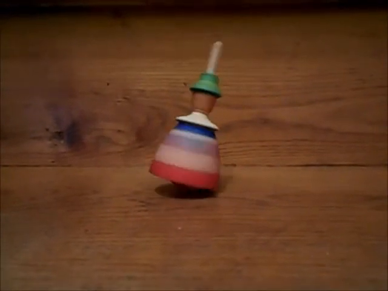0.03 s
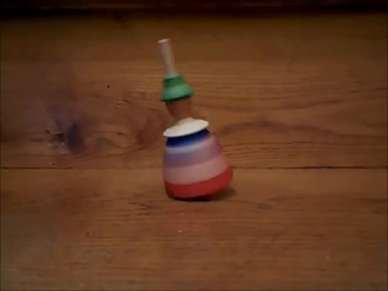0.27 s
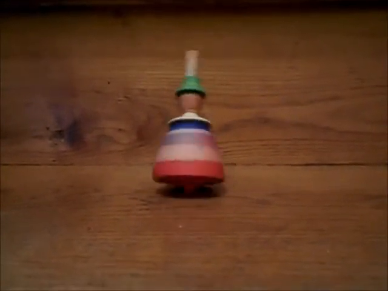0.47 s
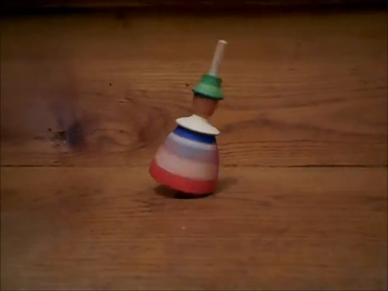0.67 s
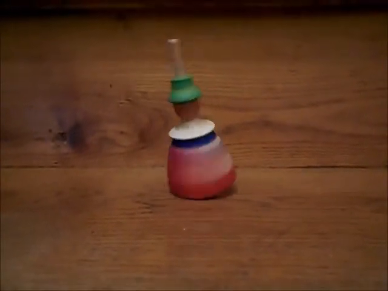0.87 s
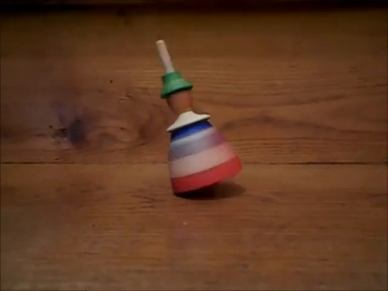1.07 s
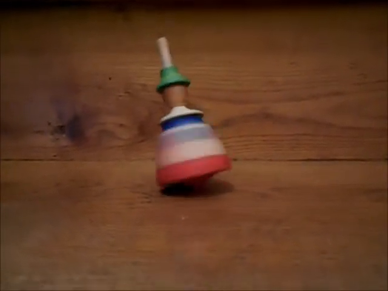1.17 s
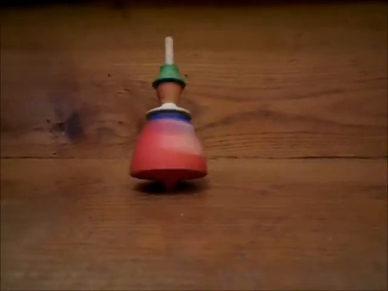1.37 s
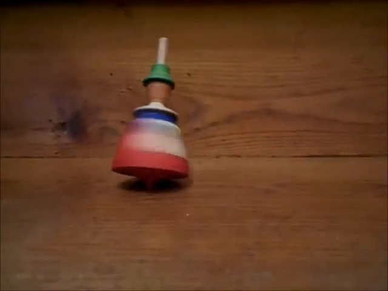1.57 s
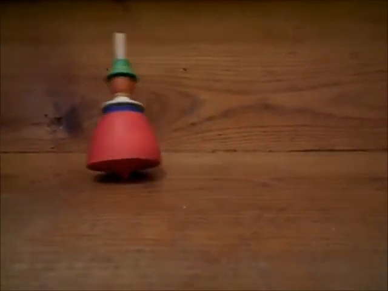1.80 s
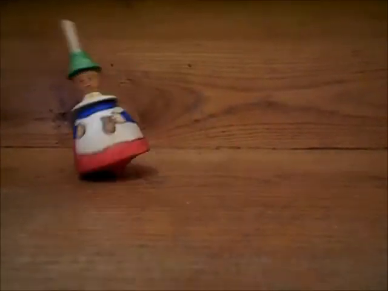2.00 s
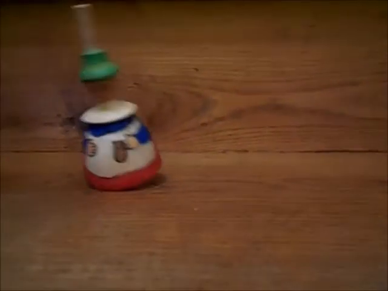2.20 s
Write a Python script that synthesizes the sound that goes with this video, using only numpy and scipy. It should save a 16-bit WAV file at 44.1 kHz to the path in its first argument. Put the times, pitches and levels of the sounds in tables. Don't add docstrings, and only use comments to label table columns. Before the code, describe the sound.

A small wooden spinning top knocks on a plank table, quickening into dense clatter, then fading

```python
import sys
import numpy as np
from scipy import signal
from scipy.io import wavfile
from scipy.ndimage import uniform_filter1d

SR = 44100
rng = np.random.default_rng(int(sys.argv[2]) if len(sys.argv) > 2 else 0)


def inscribe(sig):
    pcm = np.round(np.clip(np.atleast_2d(sig).T, -1, 1) * 32767)
    wavfile.write(sys.argv[1], SR, pcm.astype(np.int16))


def elevation(decibels):
    levels = np.asarray(decibels, float)
    return 10 ** (levels / 20)


N = 99225

PLANK, BODY, CRACK = 0, 1, 2

# start in seconds [s], body level [dB], plank level [dB], plank tilt [dB per octave].
KNOCKS = [(0.2159, -42, -27, 3), (0.2196, -13.5, -18, 2.5), (0.4012, -28, -28, 0), (.408, -15, -20, -0.5),
          (.478, -24.5, -27, 0), (0.4832, -31, -37, -2), (.521, -18, -18, -2), (.536, -39, -22.5, -2),
          (.608, -16.5, -18.5, -0.5), (0.6421, -8.5, -14, 2), (.767, -17.5, -15, 1),
          (0.8125, -11.5, -14.5, 1.5), (0.888, -19, -25.5, -1), (.920, -15, -15.5, -0.5),
          (.987, -23, -16.5, 1.5), (.997, -18, -25.5, 1), (1.049, -19, -21.5, 0),
          (1.072, -14.5, -19.5, 1.5), (1.109, -8, -14, 1.5), (1.1768, -4.5, -12, 1),
          (1.24, -9.5, -18.5, 3.5), (1.2624, -10, -15.5, -1.5), (1.297, -20.5, -20.5, 3)]
CLATTER = [(1.3197, -10.5, -16.5, 1.5), (1.361, -13, -18.5, 0.5), (1.386, -30, -17.5, 0.5),
           (1.399, -20.5, -27, -2), (1.435, -25, -30, 1), (1.450, -22, -25.5, -1), (1.477, -28, -24.5, 0),
           (1.502, -12, -15.5, 1.5), (1.532, -16, -17, 0), (1.5564, -11.5, -19, 0), (1.580, -28, -23.5, -2),
           (1.597, -13.5, -18.5, 0), (1.629, -21.5, -25.5, -2.5), (1.663, -29, -28, 1),
           (1.692, -40, -23, -0.5), (1.718, -21.5, -24, -6), (1.732, -7.5, -15, 1),
           (1.761, -18.5, -20, -3.5), (1.781, -34, -16.5, -1), (1.810, -28, -17.5, 0.5),
           (1.828, -24, -23, 3), (1.842, -29, -24, -3), (1.878, -28, -24.5, -1.5),
           (1.900, -14.5, -19.5, -1), (1.918, -27, -24.5, -3), (1.934, -37, -27, -4),
           (1.954, -28, -30.5, 2), (1.980, -39, -30, 2), (2.000, -37, -32, -2), (2.022, -45, -38, -3),
           (2.055, -41, -38.5, -1)]
# start in seconds [s], crack level [dB], level of its bright edge [dB].
TICKS = [(0.216, -40, -38.5), (0.2196, -24.5, -40.5), (0.2337, -46, -58), (0.3999, -26.5, -43),
         (0.4068, -44, -43), (0.4184, -39, -59), (0.4765, -25, -60), (0.4823, -20, -40), (0.4984, -46, -54),
         (0.5181, -21, -36.5), (0.606, -29, -53), (0.6411, -22.5, -45), (0.7673, -26, -43.5),
         (0.8115, -21.5, -38.5), (0.8128, -23, -38), (0.8884, -39, -39), (0.8884, -23.5, -35),
         (0.9187, -20, -38), (0.9863, -30, -44), (0.9958, -19, -50), (1.042, -49, -44), (1.048, -32, -48),
         (1.0717, -26, -46), (1.1088, -34, -40.5), (1.1214, -40, -54), (1.1774, -28, -41.5),
         (1.1769, -24.5, -47), (1.238, -29, -46), (1.2482, -30, -46), (1.2613, -20.5, -45.5),
         (1.297, -23.5, -47), (1.3195, -27.5, -49)]
RATTLE = [(1.3604, -24, -43), (1.3853, -26.5, -46), (1.3909, -23, -44), (1.397, -30.5, -38.5),
          (1.4324, -31, -48), (1.4363, -24.5, -39), (1.4482, -31, -38), (1.4587, -31, -51),
          (1.4645, -45, -41), (1.4774, -29, -43), (1.484, -29, -37.5), (1.4997, -21.5, -35),
          (1.5158, -35, -50), (1.5309, -25.5, -43), (1.5552, -20.5, -46), (1.5726, -29, -62),
          (1.5782, -28, -40), (1.5884, -30, -41), (1.5978, -25.5, -45), (1.6265, -27, -38),
          (1.642, -39, -47), (1.6615, -26, -42), (1.669, -33, -42.5), (1.679, -31, -40.5),
          (1.6834, -33, -46), (1.6903, -32, -48)]
LAST_TICKS = [(1.7163, -28.5, -45), (1.73, -22.5, -41), (1.7464, -42, -52), (1.7601, -26.5, -40.5),
              (1.7792, -32, -50), (1.81, -35, -48), (1.8233, -38, -51), (1.8398, -29.5, -43),
              (1.8474, -38, -46), (1.8615, -30, -40), (1.8672, -28.5, -42), (1.899, -36, -52),
              (1.915, -38, -42), (1.9225, -39, -45), (1.9793, -41, -49), (1.992, -40, -51),
              (2.1215, -33, -44)]
PLANK_DB, BODY_DB, CRACK_DB = -5, -20.5, -10
EDGE_HZ, EDGE_DB = 6520, 7.5
CONTACT_HZ = 2680
LEAD_S, CRACK_LEAD_S = 0.00027, 0.0004
WALL_S, WOOD_WALL_DB, CRACK_WALL_DB = 0.0165, -12, -10.5


def knocks():
    wood, dull, bright = np.zeros((3, N + 2 * SR))
    earlier = (-0.012, -28, -27, 0)
    for s, body_db, plank_db, tilt_db in KNOCKS + CLATTER + [earlier]:
        add(wood, PLANK, s - LEAD_S, plank_db + PLANK_DB, tilt_db)
        add(wood, BODY, s - LEAD_S, body_db + BODY_DB)
    for s, crack_db, edge_db in TICKS + RATTLE + LAST_TICKS:
        add(dull, CRACK, s - CRACK_LEAD_S, crack_db + CRACK_DB)
        add(bright, CRACK, s - CRACK_LEAD_S, edge_db + EDGE_DB)
    dull = filtered(dull, 4, EDGE_HZ)
    bright = filtered(bright, 4, EDGE_HZ, "highpass")
    delay = int(WALL_S * SR)
    wood = wood + elevation(WOOD_WALL_DB) * np.roll(wood, delay)
    edge = dull + elevation(CRACK_WALL_DB) * np.roll(dull, delay) + bright
    return (filtered(wood, 4, CONTACT_HZ) + edge)[SR:SR + N]


def add(out, layer, s, db, tilt_db=0.):
    x = ring(layer, rng.standard_normal((2, 14)), tilt_db)
    if layer == CRACK:
        x = skid(x)
    at = SR + int(s * SR)
    out[at:at + len(x)] += elevation(db) * x


def skid(x):
    grains = rng.standard_normal(400) ** 3 * (np.arange(400) < 0.0028 * SR)
    return np.convolve(x, grains / np.linalg.norm(grains))


# pitch [Hz], level [dB], time to fade by 60 dB [s].
PLANK_MODES = [(164, -12.5, 0.4), (214.3, -11.5, 0.44), (239.5, -10.5, 0.59), (300.9, -12.5, 0.29),
               (363, -11, 0.32), (440.7, -1, 0.23), (533.9, 1.5, 0.19), (569, 0, 0.14), (407, -6, 0.29),
               (763.4, 1, 0.24), (814.5, 0, 0.21), (942, 3.5, 0.07), (982, -3, 0.2), (1097.8, 2.5, 0.15)]
BODY_MODES = [(1276, -8.5, 0.22), (1330, -2.5, 0.25), (2485, -11, 0.055), (1588, 7.5, 0.047),
              (1621, 1, 0.19), (1671, -0.5, 0.19), (1885, 2, 0.035), (1865, -2, 0.11), (2150, -8.5, 0.027),
              (2337, -11, 0.052), (2585, -10, .04)]
CRACK_MODES = [(2420, -2, 0.03), (3115, 7, 0.025), (4163, 7.5, 0.021), (4620, 3, 0.01), (5664, 7, 0.029),
               (6090, 5, 0.017), (6760, 5, 0.0063), (7270, 0, 0.0054), (8780, 0, 0.0065),
               (9890, 0.5, 0.009)]
# lowest [Hz], highest [Hz], for plank, body and crack.
DENSE_HZ = (420, 1127), (1300, 3180), (2600, 6700)
DENSE_DB, DENSE_T60 = (-8.5, -13, -5.5), (0.2, 0.084, 0.028)
PUNCH_DB, PUNCH_T60 = (-4, 4, 3.5), (0.025, 0.043, 0.0044)
ECHO_S, ECHO_DB = 0.0033, (-13, 5, -14)
SCATTER_DB, DETUNE = (3.0, 3, 2.5), 0.0069
SWELL_CYCLES = (2.14, 0.03, 0.05)


def ring(layer, chance, tilt_db=0.):
    hz, db, t60 = np.array((PLANK_MODES, BODY_MODES, CRACK_MODES)[layer]).T[:, :, None]
    level_luck, pitch_luck = chance[:, :len(hz), None]
    t = np.arange(SR // (3, 5, 12)[layer]) / SR
    db = db + tilt_db * np.log2(hz / 650)
    sign = (-1.) ** (np.arange(len(hz))[:, None] // (2, 8, 1)[layer])
    level = sign * elevation(db + SCATTER_DB[layer] * level_luck)
    swell = 1 - np.exp(-t * hz / SWELL_CYCLES[layer])
    tones = np.sin(2 * np.pi * hz * (1 + DETUNE * pitch_luck) * t)
    modes = level * fade(t, np.minimum(t60, 0.4)) * swell * tones
    dense = noise_band(len(t), *DENSE_HZ[layer]) * fade(t, DENSE_T60[layer])
    x = modes.sum(axis=0) / np.sqrt(np.sum(elevation(db) ** 2)) + elevation(DENSE_DB[layer]) * dense
    x = x * (1 + elevation(PUNCH_DB[layer]) * fade(t, PUNCH_T60[layer]))
    return x + elevation(ECHO_DB[layer]) * np.pad(x, (int(ECHO_S * SR), 0))[:len(t)]


# time in seconds [s], rolling level [dB].
ROLL = [(.4, -53), (.6, -49.5), (1.2, -30), (1.32, -28), (1.42, -35), (1.55, -28), (1.70, -32.5),
        (1.80, -30), (1.87, -34), (1.97, -37), (2.03, -41.5), (2.06, -56.5)]
# time in seconds [s], scraping level [dB].
SCRAPE = [(.4, -62.5), (1.05, -62), (1.4, -63), (1.66, -58.5), (1.77, -67), (1.81, -50), (1.88, -57),
          (1.91, -53), (2.01, -52.5), (2.05, -60), (2.13, -58), (2.25, -52)]


def rolling():
    roll = bumps(ROLL, per_s=480, scatter_db=4)
    scrape = bumps(SCRAPE, per_s=1300, scatter_db=2)
    out = elevation(5.5 + 2.0 * walk(40.28)) * band(scrape, 6900, 10140)
    for x, layer, db in ((roll, PLANK, -2.5), (roll, BODY, -14.5), (scrape, CRACK, -2)):
        blow = ring(layer, np.zeros((2, 14)))
        out = out + elevation(db) * signal.fftconvolve(x, blow / np.linalg.norm(blow))[:N]
    return out


def bumps(curve, per_s, scatter_db):
    s, db = np.array(curve).T
    struck = rng.random(N) < per_s / SR
    size = np.minimum(rng.exponential(size=N), 3)
    level = elevation(np.interp(np.arange(N) / SR, s, db, left=-90))
    return unit(struck * elevation(scatter_db * size)) * level


SQUEAK_HZ, SQUEAK_S, SQUEAK_DB, SQUEAK_T60 = 4650, 0.061, -51.5, 0.85
SQUEAK_SAG = 0.099
WHINE_HZ, WHINE_DB, WHINE_T60 = 7300, -62.0, 0.8
WHISTLE_HZ, WHISTLE_S, WHISTLE_DB = 5230, (0.62, 1.12), -63.5


def tip():
    t = np.arange(N) / SR
    since = np.maximum(t - SQUEAK_S, 0)
    pitch = SQUEAK_HZ * (1 - SQUEAK_SAG * since + 0.0103 * walk(68))
    tone = np.sin(2 * np.pi * np.cumsum(pitch) / SR)
    onset = np.minimum(since / 0.013, 1)
    squeak = tone * onset * fade(since, SQUEAK_T60) * elevation(SQUEAK_DB + 3.6 * walk(60))
    whine = noise_band(N, WHINE_HZ * 0.97, WHINE_HZ * 1.03) * elevation(WHINE_DB) * fade(t, WHINE_T60)
    whistle = noise_band(N, WHISTLE_HZ * 0.985, WHISTLE_HZ * 1.015) * elevation(WHISTLE_DB + 2.0 * walk(11.6))
    return squeak + whine + whistle * (t > WHISTLE_S[0]) * (t < WHISTLE_S[1])


# pitch [Hz], hiss level [dB per Hz].
ROOM = [(15, -27), (25, -9.5), (98, -5), (262, 0.5), (668, -9), (1800, -9), (2900, -22), (4560, -18.5),
        (7000, -27), (10500, -29), (22000, -120)]
ROOM_DB, FLICKER_DB = -47.5, 1.3
HUM_HZ, HUM_DB = 53.5, -61


def room():
    hz, db = np.array(ROOM).T
    hiss = np.zeros(N)
    for f in 28 * 2 ** np.arange(0, 9, 0.5):
        level_db = np.interp(np.log(f), np.log(hz), db) + FLICKER_DB * walk(9.85)
        hiss += band(rng.standard_normal(N), f / 1.317, f * 1.08) * elevation(level_db)
    hum = noise_band(N, HUM_HZ * 0.56, HUM_HZ * 1.3)
    return elevation(ROOM_DB) * unit(hiss) + elevation(HUM_DB) * hum


def unit(x):
    return x / np.sqrt(np.mean(x ** 2))


def filtered(x, order, hz, kind="lowpass"):
    return signal.sosfilt(signal.butter(order, hz, kind, fs=SR, output="sos"), x)


def band(x, lo_hz, hi_hz):
    return filtered(x, 2, [lo_hz, hi_hz], "bandpass")


def noise_band(n, lo_hz, hi_hz):
    return unit(band(rng.standard_normal(n), lo_hz, hi_hz))


def fade(t, t60):
    return 10 ** (-3 * t / t60)


def walk(rate):
    k = int(SR / rate)
    steps = np.repeat(rng.standard_normal(N // k + 1), k)
    return unit(uniform_filter1d(uniform_filter1d(steps, k), k)[:N])


def scene():
    top = filtered(knocks() + rolling(), 3, 107, "highpass")
    t = np.arange(SR // 2) / SR
    tail = rng.standard_normal(len(t)) * fade(t, 0.093) * (t > 0.012)
    echoes = signal.fftconvolve(top, tail / np.linalg.norm(tail))[:N]
    return (top + elevation(-23.5) * echoes + tip() + room())[None]


def band_limit(x):
    return signal.sosfilt(signal.butter(12, 11400, fs=SR, output="sos"), x)


# start in seconds [s], length [s], share lost [0 to 1].
DROPOUTS = [
    (0.345, 0.015, 0.8),
    (0.534, 0.017, .99),
    (1.031, 0.0064, 0.8),
]
LEFT_HZ, LEFT_S, LEFT_DB = 5600, (0.528, 0.554), -53.5
OVERLOAD, TOP_HZ = 0.68, 10500


def record(dry):
    t = np.arange(N) / SR
    dry = OVERLOAD * np.tanh(dry / OVERLOAD)
    lost = sum(share * (t > s) * (t < s + length) for s, length, share in DROPOUTS)
    lost = uniform_filter1d(lost, size=90)
    treble = dry - signal.sosfiltfilt(signal.butter(10, 2200, fs=SR, output="sos"), dry)
    gate = uniform_filter1d(1. * (t > LEFT_S[0]) * (t < LEFT_S[1]), size=200)
    left = gate * np.sin(2 * np.pi * LEFT_HZ * t)
    mix = dry - lost * treble + elevation(LEFT_DB) * left
    top_cut = signal.cheby2(12, 60, TOP_HZ * 1.12, fs=SR, output="sos")
    return band_limit(signal.sosfilt(top_cut, mix))


dry = scene()
out = record(dry)
inscribe(out)
```